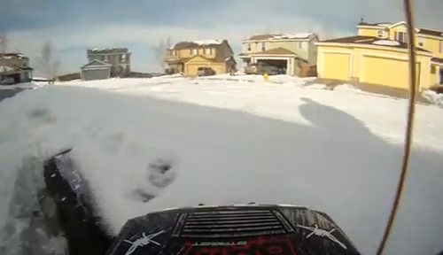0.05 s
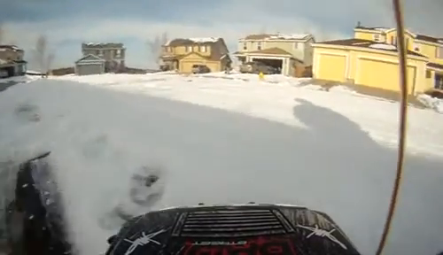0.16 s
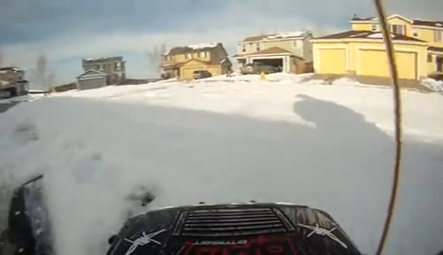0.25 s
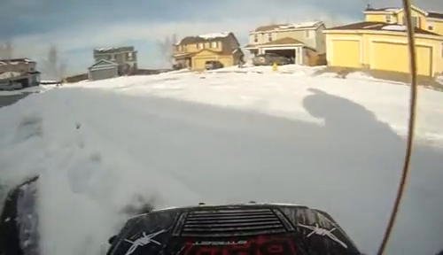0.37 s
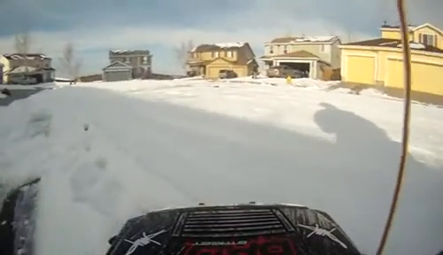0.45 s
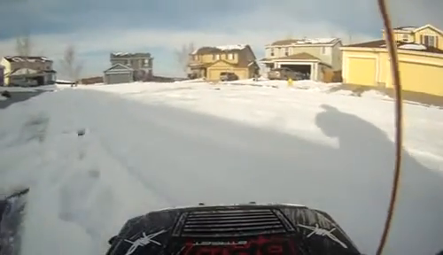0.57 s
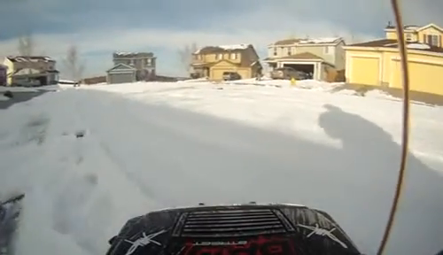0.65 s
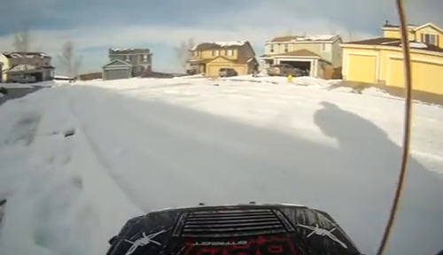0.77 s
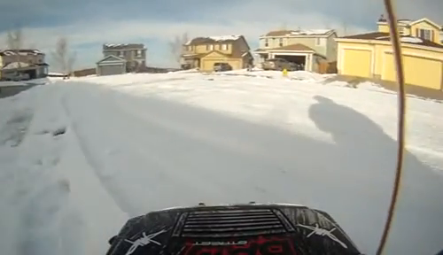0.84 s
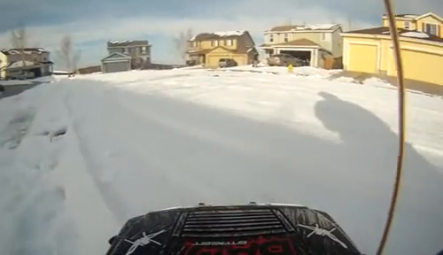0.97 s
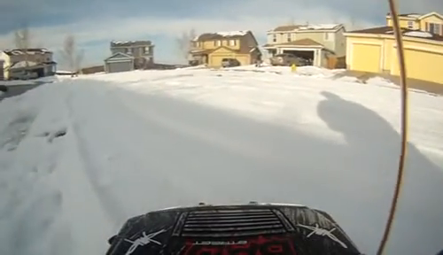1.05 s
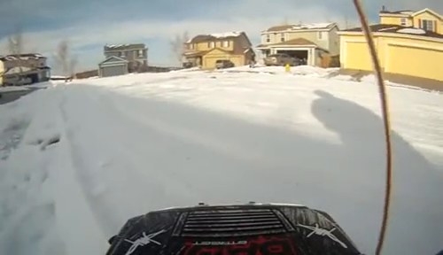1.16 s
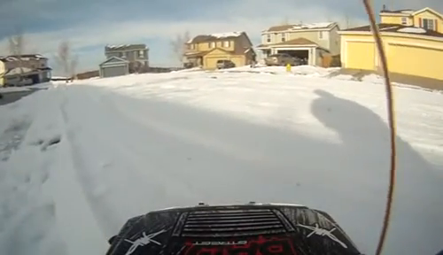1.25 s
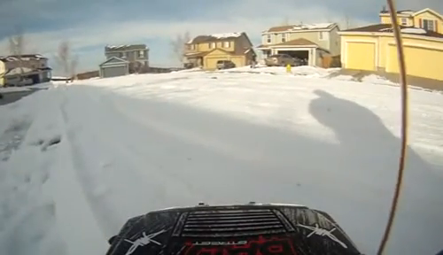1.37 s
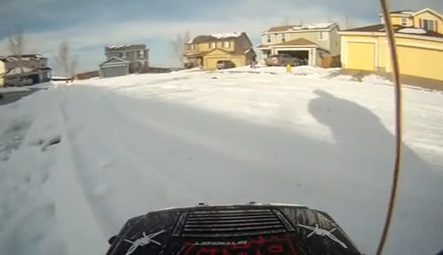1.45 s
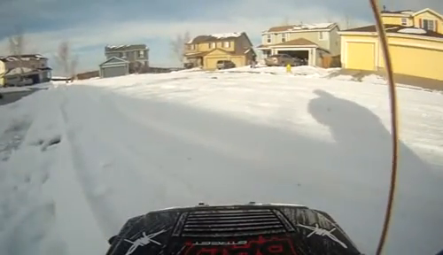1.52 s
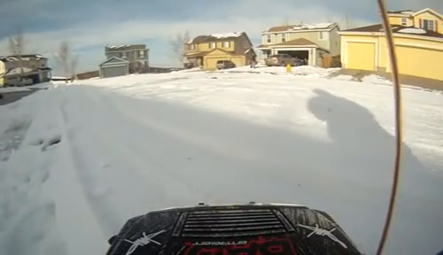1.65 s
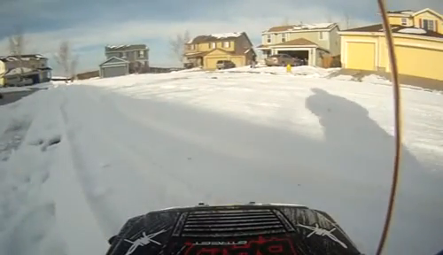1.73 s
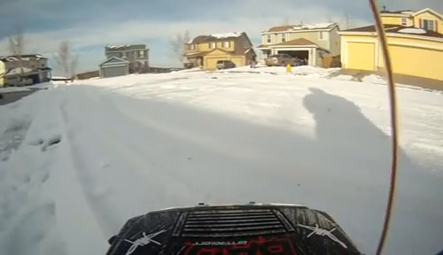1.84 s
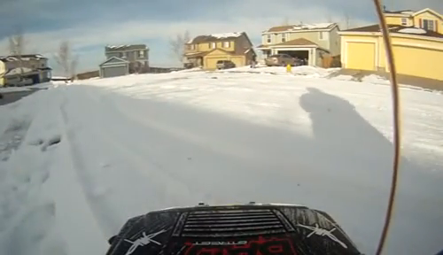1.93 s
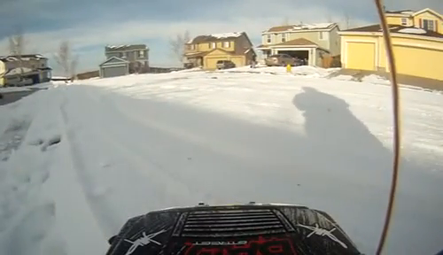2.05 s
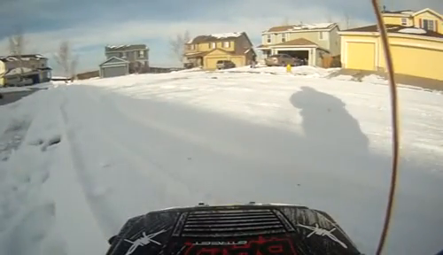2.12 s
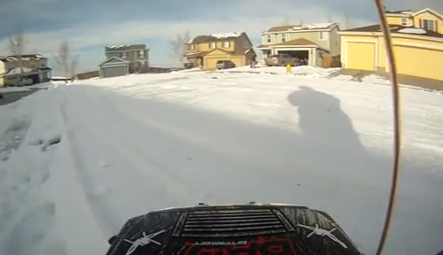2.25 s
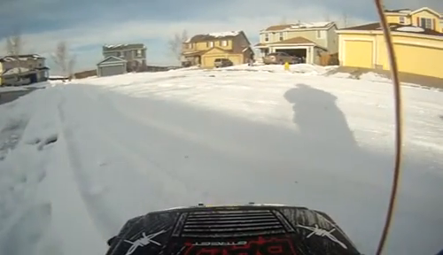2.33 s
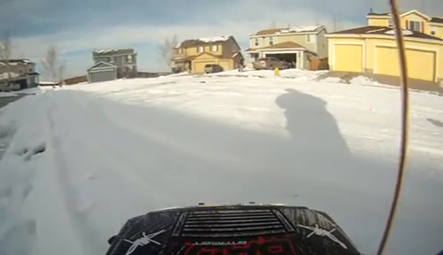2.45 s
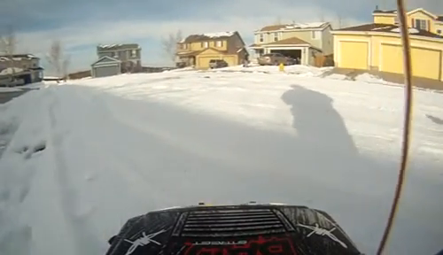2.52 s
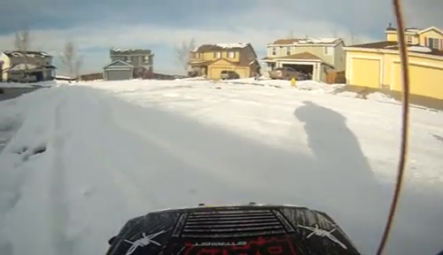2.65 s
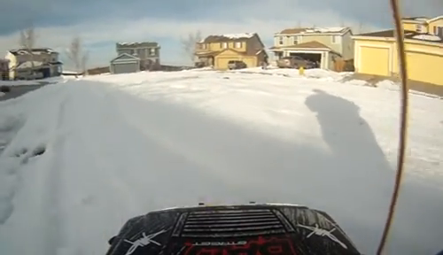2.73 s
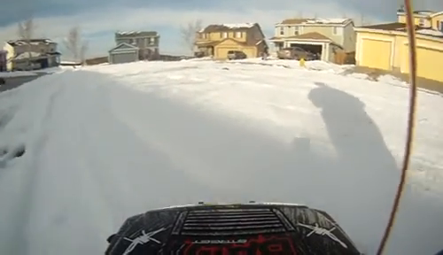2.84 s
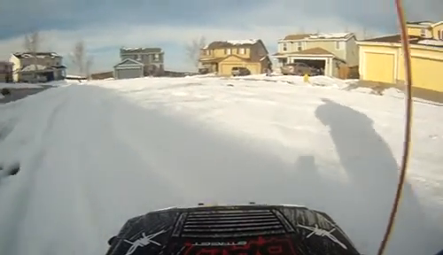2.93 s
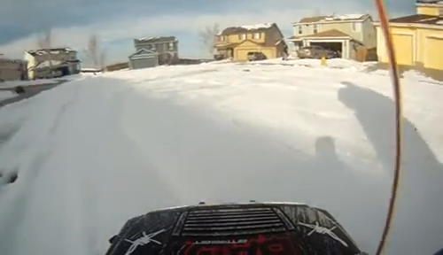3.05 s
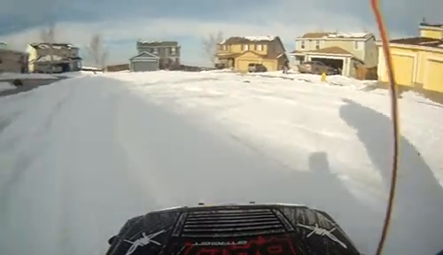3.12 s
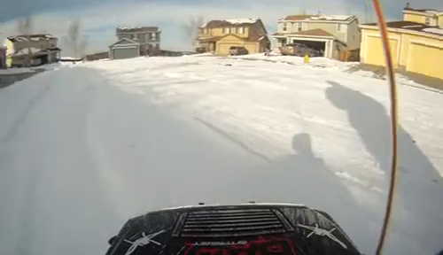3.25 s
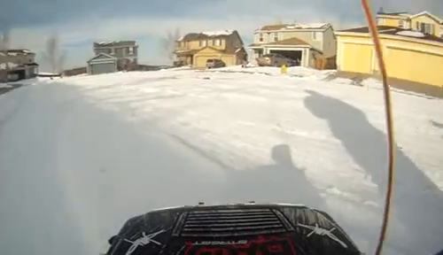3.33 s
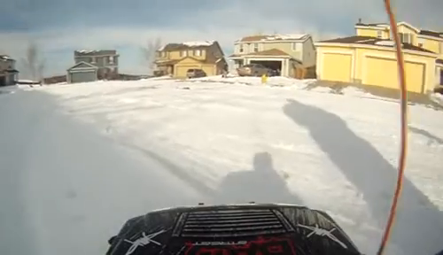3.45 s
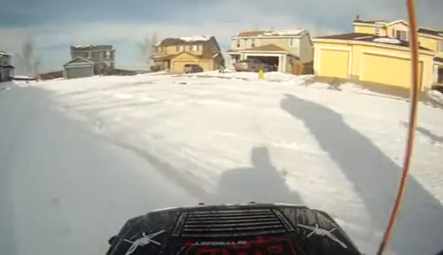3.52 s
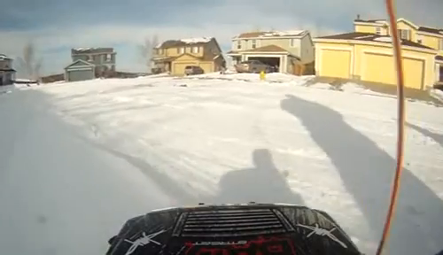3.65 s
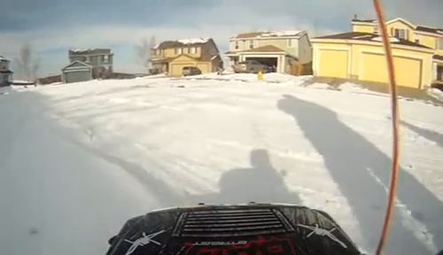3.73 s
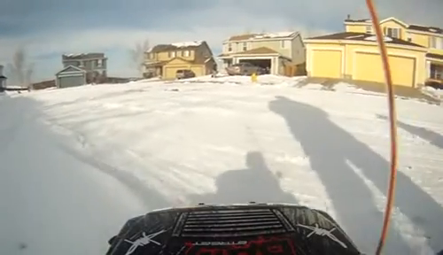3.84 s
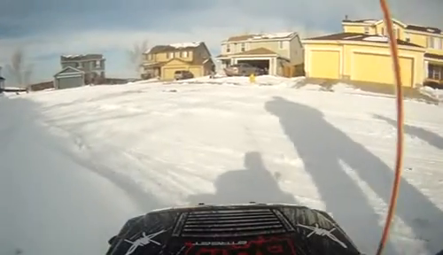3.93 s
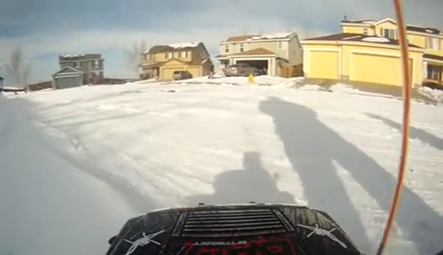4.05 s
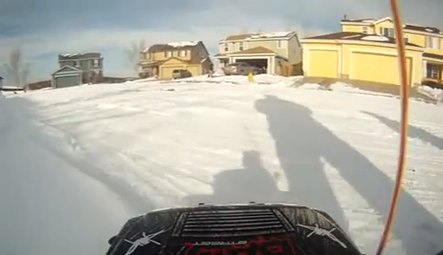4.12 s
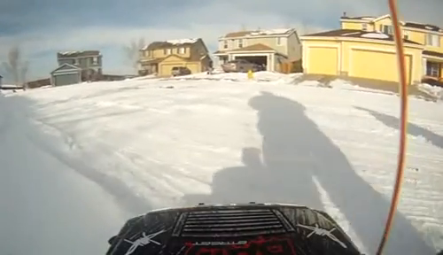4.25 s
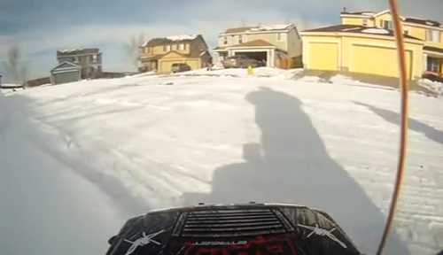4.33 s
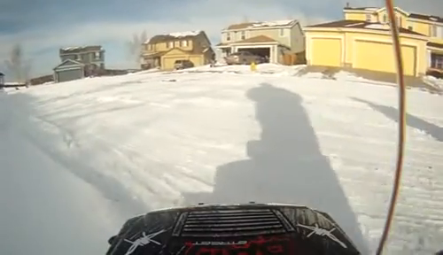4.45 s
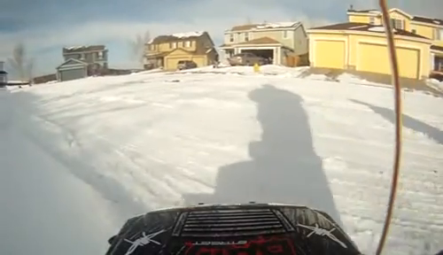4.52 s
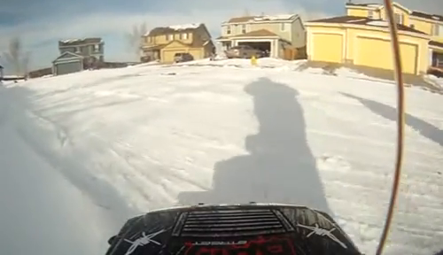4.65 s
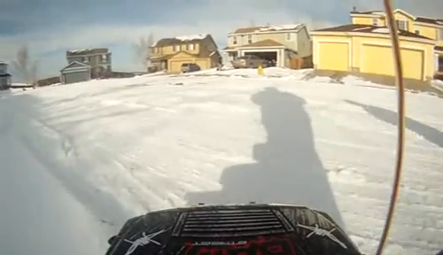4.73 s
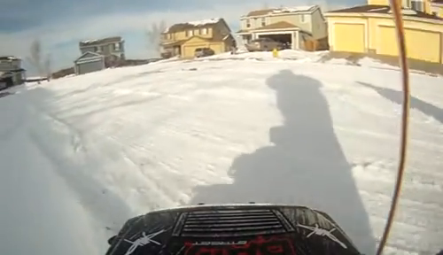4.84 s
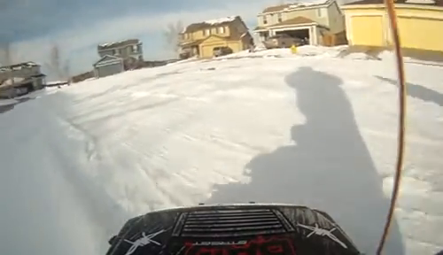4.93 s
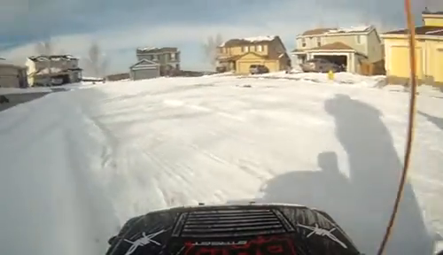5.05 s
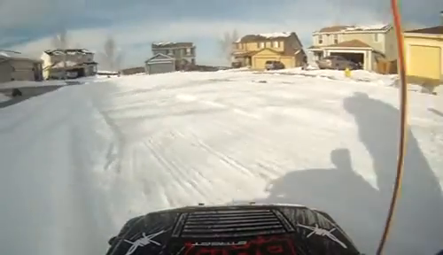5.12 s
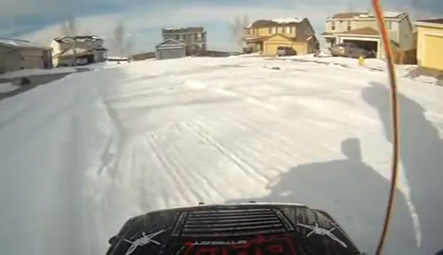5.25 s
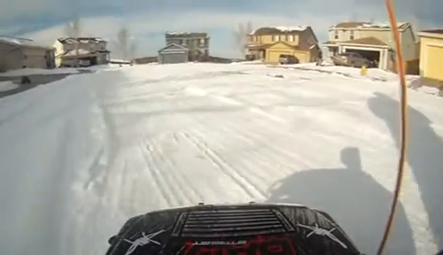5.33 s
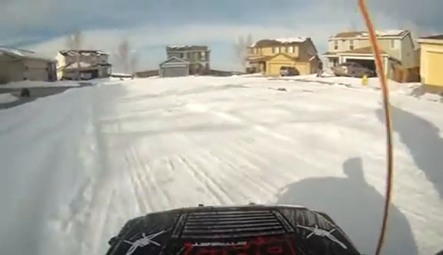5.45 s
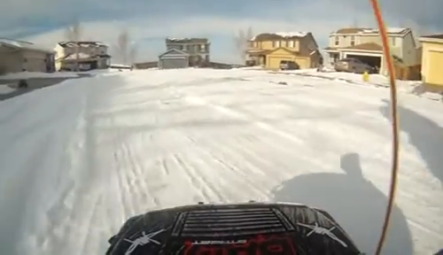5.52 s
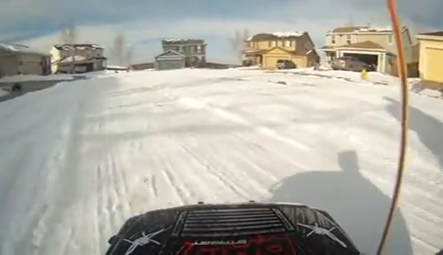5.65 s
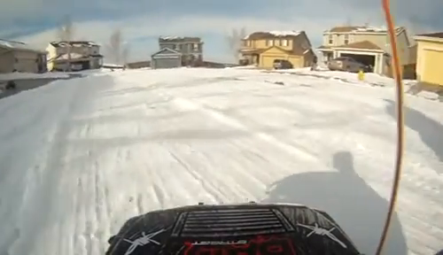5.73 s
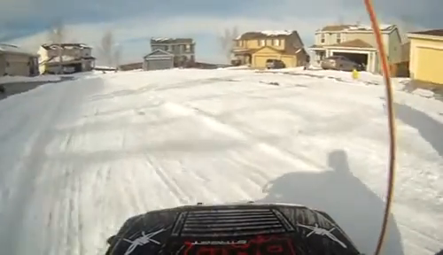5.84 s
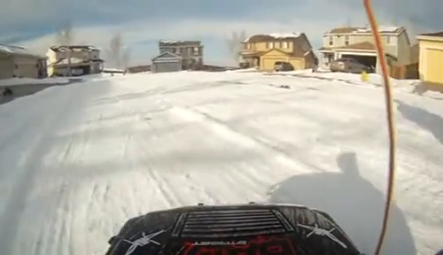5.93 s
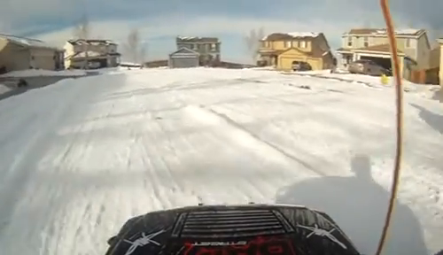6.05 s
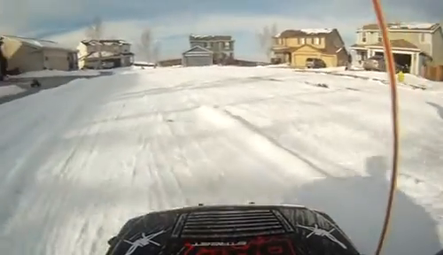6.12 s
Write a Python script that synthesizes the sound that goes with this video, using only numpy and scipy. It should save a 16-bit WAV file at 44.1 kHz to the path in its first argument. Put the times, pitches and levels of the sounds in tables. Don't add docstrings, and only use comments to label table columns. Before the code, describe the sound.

A low-grade microphone centimetres from the wheels catches grainy, boxy snow crunching that surges and dips over bumps, with deep spring wobble and plastic ticking. Everything drops to quiet hiss, with muffled snow pressed by boots. Then a cracking jolt, more crunching, a softer stretch, short chirpy gear squeaks with another hard knock, and finally dense rattling, thumping travel over ruts.

```python
import sys
import numpy as np
from scipy import signal
from scipy.fft import rfft, irfft, next_fast_len
from scipy.io import wavfile
from scipy.ndimage import uniform_filter1d

SR = 44100
rng = np.random.default_rng(int(sys.argv[2]) if len(sys.argv) > 2 else 0)


def volts_from_decibels(level):
    exponent = np.asarray(level, float) / 20
    return 10 ** exponent


def wav_out(sig):
    wavfile.write(sys.argv[1], SR, np.round(np.clip(np.atleast_2d(sig).T, -1, 1) * 32767).astype(np.int16))


N = 272538
TIME = np.arange(N) / SR
STOP_S = 1.3033


def rms_one(x):
    return x / np.sqrt(np.mean(x ** 2) + 1e-20)


def bandpass(x, low_hz, high_hz, order=2):
    return signal.sosfilt(signal.butter(order, [low_hz, high_hz], "band", fs=SR, output="sos"), x)


def filtered(x, points):
    hz, db = np.transpose(points)
    size = next_fast_len(N + 4096)
    bins = np.fft.rfftfreq(size, 1 / SR) + 0.00099
    gain = volts_from_decibels(np.interp(np.log(bins), np.log(hz), db))
    return irfft(rfft(x, size) * gain, size)[:N]


def in_time(rows):
    s, *columns = np.transpose(rows)
    return [np.interp(TIME, s, column) for column in columns]


def drift(rate_hz):
    r = np.exp(-80 * np.pi * rate_hz / SR)
    slow = signal.lfilter([1], [1, -2 * r, r * r], rng.standard_normal(N // 40 + 2002))[2000:]
    return np.interp(np.arange(N) / 40, np.arange(len(slow)), rms_one(slow))


def resonance(x, hz, width_hz):
    r = np.exp(-np.pi * width_hz / SR)
    poles = [1, -2 * r * np.cos(2 * np.pi * hz / SR), r * r]
    return signal.lfilter([(1 - r * r) / 2, 0, (r * r - 1) / 2], poles, x)


def body(x, modes, flicker_db, rate_hz, tilt_db=0):
    out = np.zeros(N)
    for k, (hz, width_hz, db) in enumerate(modes):
        uneven = x * volts_from_decibels(flicker_db * drift(rate_hz))
        level = volts_from_decibels(db + tilt_db * np.log2(1400 / hz))
        out += (-1) ** k * resonance(uneven, hz, width_hz) * level
    return out


def grains(per_s, spread_db):
    sizes = volts_from_decibels(spread_db * np.minimum(rng.exponential(1, N), 4)) * rng.choice([-1, 1], N)
    return rms_one(sizes * (rng.random(N) < per_s / SR)) + 1e-18


def dying(at_s, t60_s, rise_s):
    age = np.maximum(TIME - at_s, 0)
    return (1 - np.exp(-age / rise_s)) * volts_from_decibels(-60 * age / t60_s)


def peaks_db(s, level_db, rise, fall):
    s, level_db, rise, fall = (np.reshape(column, (-1, 1)) for column in (s, level_db, rise, fall))
    age = TIME[::40] - s
    each = level_db - np.maximum(-age * rise, age * fall)
    total_db = 10 * np.log10(np.sum(volts_from_decibels(2 * each), axis=0) + 1e-14)
    return np.interp(TIME, TIME[::40], total_db)


def while_moving(db, ring_out, drop_db=0):
    still = TIME - STOP_S
    drop = drop_db * np.clip(still / 0.02, 0, 1)
    fading = db[round(STOP_S * SR)] - drop - ring_out * still
    return np.where((still > 0) & (TIME < KNOCKS[0][0] + .004), fading, db)


# (time [s], tyre load as crunch level [dB], crustiness [dB], roughness [dB])
DRIVE = [(0.0, -19, -16.5, -21), (0.285, -23, -22, -31.5), (0.693, -23, -25, -28.5),
         (0.96, -25.5, -31, -29.5), (1.34, -21.5, -28, -30), (2.392, -39, -25, -20),
         (2.62, -17.5, -22.5, -36), (2.86, -19, -21, -27.5), (3.383, -18, -22, -20.5),
         (3.722, -19, -29, -26.5), (3.809, -24.5, -31, -33), (3.96, -39.5, -28.4, -29.5),
         (4.46, -30.5, -24.5, -30), (4.71, -23.5, -25.5, -27), (5.085, -16, -22.5, -24.5),
         (5.418, -18.5, -20, -26), (5.688, -17.5, -19, -22.5), (6.18, -22.5, -22, -20.5)]
# (time [s], depth [dB], recovery [s])
HOPS = [(0.043, 11, 0.13), (0.307, 7, 0.12), (0.545, 2.5, 0.043), (0.72, 5, 0.068), (1.069, 11, 0.063),
        (1.167, 9, 0.064), (1.245, 3.5, 0.11), (2.713, 8.5, 0.17), (2.915, 16, 0.16), (3.039, 10, 0.051),
        (3.105, 7, 0.146), (3.384, 7.5, 0.21), (3.623, 4.6, 0.045), (3.716, 6.5, 0.077), (4.165, 3.5, 0.1),
        (4.346, 6.5, 0.087), (4.796, 6, 0.073), (4.96, 3.5, 0.087), (5.111, 11, 0.23), (5.238, 4, 0.22),
        (5.459, 14.5, 0.26), (5.698, 9.5, 0.12), (5.793, 10, 0.214), (6.062, 5, 0.031)]
# (time [s], depth [dB], recovery [s])
MORE_HOPS = [
    (1.247, 10, .012),
    (4.62, 16, .057),
]


def tyre_load():
    load_db = in_time(DRIVE)[0]
    unload_s = 0.027
    for s, depth_db, recovery_s in HOPS + MORE_HOPS:
        age = TIME - s
        dip = np.minimum(age / unload_s, 1 - (age - unload_s) / recovery_s)
        load_db = load_db - depth_db * np.clip(dip, 0, 1)
    return while_moving(load_db, 190, drop_db=19)


# (frequency [Hz], width [Hz], level [dB])
SHELL = [(575, 131, -8.5), (746.3, 36.5, -2), (1010.7, 104, -0.5), (1151, 32.5, 4), (1402, 183, -0.5),
         (1731, 302, 0.5), (1833, 181, 2.5), (2007, 91, -1.5), (2183, 159, -5.5), (2579, 73, -12)]
# (frequency [Hz], width [Hz], level [dB])
UPPER_SHELL = [(2730, 150, -12), (2877, 100, -2.5), (3489, 85, -1.4), (3640, 150, -6)]


def crunch():
    crunch_db, upper_db = tyre_load(), in_time(DRIVE)[1]
    tilt_db = np.clip(-6 - 0.22 * crunch_db, -5, 12)
    breaks = grains(per_s=5000, spread_db=3.5) * volts_from_decibels(0.51 * drift(22))
    main = rms_one(body(breaks, SHELL, 1.8, 7, tilt_db))
    main = bandpass(main, 420, 2800, order=4)
    upper = rms_one(body(breaks, UPPER_SHELL, 3.5, 33))
    upper = bandpass(upper, 2700, 3950)
    haze = rms_one(bandpass(breaks, 3900, 5600))
    return volts_from_decibels(crunch_db) * (1.271 * main + volts_from_decibels(upper_db) * upper + volts_from_decibels(-45) * haze)


# (frequency [Hz], level per Hz [dB])
HISS = [(18, -25), (30, -2), (65, -3), (310, -8.5), (370, -12), (700, -13.5), (4080, -21.5), (5800, -31.5),
        (7540, -64), (12800, -120)]


def recorder_hiss():
    return volts_from_decibels(-61) * rms_one(filtered(rng.standard_normal(N), HISS))


# (time [s], bounce level [dB], pitching level [dB], thud level [dB])
BUMPS = [(0.042, -15.5, -18.5, -21), (0.188, -14.5, -60.0, -30.5), (0.241, -17, -20.7, -30.5),
         (0.311, -15, -17, -31), (0.54, -13, -22, -32.5), (0.914, -60.0, -26.0, -39),
         (1.023, -14, -27, -35.5), (1.17, -21.5, -17, -38.5), (2.619, -14.5, -28.4, -34.6),
         (2.732, -17, -14.5, -30), (2.801, -15, -60.0, -41), (2.916, -14.5, -15, -26),
         (3.035, -17.1, -58, -54), (3.122, -18, -29, -29.5), (3.385, -20, -16, -31),
         (3.969, -19.4, -27, -66), (4.045, -26, -27, -57), (4.271, -24, -22.5, -64), (4.513, -24, -18, -42),
         (4.722, -65, -24, -36), (4.821, -62, -20, -35), (4.975, -14.5, -20, -34), (5.125, -15, -14, -29.5),
         (5.246, -16, -24, -30), (5.456, -9.5, -19, -29.5), (5.55, -28, -19.5, -54), (5.702, -15, -16, -34),
         (5.799, -13, -24.5, -33.5), (5.929, -23.5, -24, -75), (6.052, -15, -31, -46)]
# (share of roughness [dB], build-up [dB/s], die-away [dB/s], ring-out at the stop [dB/s])
MOTIONS = [
    (1.5, 240, 198, 94),
    (-3.5, 203, 236, 57),
    (-17, 245, 389, 108),
]


def motion_db(column):
    share_db, rise, fall, ring_out = MOTIONS[column]
    bumps = np.array(BUMPS)
    bump_db = peaks_db(bumps[:, 0], bumps[:, column + 1], rise, fall)
    ground_db = in_time(DRIVE)[2] + share_db
    power = volts_from_decibels(2 * bump_db) + volts_from_decibels(2 * ground_db)
    return while_moving(10 * np.log10(power), ring_out)


def fed(modes, size):
    low, high = min(modes)[0], max(modes)[0]
    swing = body(rng.standard_normal(N), modes, 1.54, 12)
    swing = resonance(swing, np.sqrt(low * high), 1.59 * (high - low))
    level = np.sqrt(uniform_filter1d(swing ** 2, size=size) + 1e-12)
    return rms_one(swing / level ** 1.19)


# (frequency [Hz], width [Hz], level [dB])
BOUNCE = [(43.54, 3.5, -6), (34, 17.3, -17.5), (51.1, 2.7, -9.5)]
# (frequency [Hz], width [Hz], level [dB])
PITCHING = [(74.95, 12.2, 3), (63.1, 9, 4.5), (91, 46, -15.5)]
# (frequency [Hz], width [Hz], level [dB])
THUD = [(115.4, 35, -3), (169, 19.2, 1.4), (256, 17.2, -4), (356, 270, -20.5)]


def shudder():
    bounce_db, pitching_db, thud_db = (motion_db(column) for column in range(3))
    springs = volts_from_decibels(bounce_db) * fed(BOUNCE, size=3000) + volts_from_decibels(pitching_db) * fed(PITCHING, size=2500)
    thuds = volts_from_decibels(thud_db) * fed(THUD, size=1500)
    decay = volts_from_decibels(-60 / (0.025 * SR))
    bursts = signal.lfilter([1], [1, -decay], np.abs(grains(per_s=270, spread_db=3)))
    rattle = bandpass(bursts * rng.standard_normal(N), 3600, 6500)
    rattle_db = -62 + (np.clip(thud_db, -110, -32) + 34.5) + 2 * drift(9)
    return springs + thuds + volts_from_decibels(rattle_db) * rms_one(rattle)


def thumps():
    out, age = np.zeros(N + SR), np.arange(-1500, 1500) / SR
    push = np.cos(2 * np.pi * 75 * age) * np.exp(-.5 * (age / 0.0039) ** 2)
    for s, _, _, thud_db in BUMPS:
        i = round(s * SR) - 1500
        out[i:i + 3000] += volts_from_decibels(thud_db + 12) * push
    return out[:N]


# (time [s], peak [dB])
TICKS = [(0.0287, -30.5), (0.1391, -57), (0.1655, -41), (0.2189, -30.5), (0.257, -36), (0.4574, -43),
         (0.5312, -34), (0.5465, -30.5), (0.8485, -36.5), (1.0116, -41), (1.1867, -38), (1.2554, -48),
         (2.4518, -40), (2.5215, -36), (2.58, -44), (2.6454, -39), (2.726, -29), (2.787, -39),
         (2.8245, -38), (2.8694, -40), (2.9003, -32), (2.9871, -50), (3.1098, -32), (3.1953, -38),
         (3.2809, -32), (3.3026, -30), (3.3708, -28.5), (3.4166, -35), (4.1425, -40), (4.485, -38.5)]
# (time [s], peak [dB])
RUT_TICKS = [(4.6194, -22), (4.6515, -34), (4.73, -39), (4.8803, -33), (4.9377, -40), (4.9536, -35),
             (5.0035, -32), (5.085, -37), (5.1148, -29), (5.1627, -35), (5.2066, -32.5), (5.235, -34.5),
             (5.3532, -43), (5.4211, -34), (5.44, -37), (5.458, -28), (5.4979, -38), (5.5448, -39),
             (5.5852, -40), (5.6341, -42), (5.674, -38), (5.7296, -36), (5.7825, -34), (5.8628, -37),
             (5.9975, -38), (6.0413, -32.5), (6.102, -39), (6.128, -34)]


def ticks():
    out, noise = np.zeros(N), rng.standard_normal(N)
    small = []
    for s, _, _, thud_db in BUMPS:
        for early in rng.uniform(-1, 1, 2):
            small.append((abs(s + .09 * early), -44 + 0.68 * (thud_db + 35.5)))
    clear, chatter = TICKS + RUT_TICKS, []
    for s, peak_db in clear:
        for _ in range(2):
            if _ == 0:
                later_s, softer_db = 0, 0
                gaps = rng.uniform(.4, 1.6, (2, 2))
            later_s += .011 * gaps[_, 0]
            softer_db += 5.5 * gaps[_, 1]
            chatter.append((s + later_s, peak_db - softer_db))
    age = np.arange(900) / SR
    for s, peak_db in clear + small + chatter:
        i = round(s * SR)
        burst = noise[i:i + 900] * volts_from_decibels(peak_db + 7.0 - 60 * age / .022)[:N - i]
        burst = resonance(burst, rng.uniform(3700, 4900), 2400)
        out[i:i + 900] += resonance(burst, 4300, 3600)
    return out


# (time [s], length [s], first frequency [Hz], last frequency [Hz], level [dB])
SQUEAKS = [(4.437, 0.06, 1730, 1617, -17.5), (4.481, 0.063, 1130, 1188, -19),
           (4.529, 0.019, 1390, 1750, -16.5), (4.548, 0.027, 1850, 1802, -12),
           (4.571, 0.039, 1885, 1854, -15.5), (5.17, 0.067, 1160, 1145, -19.5),
           (5.355, 0.047, 1950, 1817, -18), (1.17, 0.035, 5430, 5400, -48), (1.22, .018, 5430, 5280, -47)]
# (time [s], frequency [Hz], level [dB], t60 [s])
AFTER_RING = [(1.29, 1150, -34, .3), (1.3, 1375, -44, .6), (1.36, 170, -46, .35)]


def squeaks():
    out = np.zeros(N)
    for s, length, first_hz, last_hz, level_db in SQUEAKS:
        end = s + length
        hz = np.interp(TIME, [s, end], [first_hz, last_hz])
        gate = np.clip(np.minimum((TIME - s) / .008, (end - TIME) / .003), 0, 1)
        turn = 2 * np.pi * np.cumsum(hz + 35 * drift(154.4)) / SR
        grip = 1 + .35 * drift(110)
        out += gate * grip * volts_from_decibels(level_db) * (np.sin(turn) + 0.048 * np.sin(2 * turn))
    for s, hz, level_db, t60_s in AFTER_RING:
        out += volts_from_decibels(level_db) * np.sin(2 * np.pi * hz * TIME) * dying(s, t60_s, 0.0049)
    return out


# (time [s], level [dB], swell [dB/s], fade [dB/s])
STEPS = [(1.585, -58, 119, 86), (1.63, -61.5, 111, 905), (1.89, -62, 117, 903), (1.93, -55.5, 898, 74),
         (2.019, -42.5, 254, 399)]
# (frequency [Hz], level per Hz [dB])
STEP_COLOUR = [(290, -41), (500, -13), (879, -8), (1150, 1), (1270, -9), (1780, 2.5), (3810, -12),
               (5800, -26), (7540, -68), (12800, -120)]


def footsteps():
    packing = filtered(grains(per_s=3000, spread_db=4.0), STEP_COLOUR)
    return volts_from_decibels(peaks_db(*np.transpose(STEPS))) * rms_one(packing)


# (time [s], peak [dB], t60 [s], jolt to the springs [dB], rebound delay [s])
KNOCKS = [
    (2.3655, -2.5, .06, 2, .02),
    (4.62, -4, .045, -1, .0175),
]


def knocks():
    out, muffle = np.zeros(N), signal.butter(3, 2600, fs=SR, output="sos")
    for s, level_db, t60_s, jolt_db, rebound_s in KNOCKS:
        crack = rng.standard_normal(N)
        shell = body(crack, SHELL, 0, 1) + 0.25 * resonance(crack, 1400, 3300)
        shell = rms_one(signal.sosfilt(muffle, shell))
        edges = .5 * resonance(crack, 3070, 250) + 1.64 * resonance(crack, 153, 246)
        kick = np.sin(2 * np.pi * 45 * (TIME - s - rebound_s)) * dying(s, .16, .03)
        floor_pan = np.sin(2 * np.pi * 170 * (TIME - s)) * dying(s, 0.04, 0.0013)
        out += volts_from_decibels(level_db) * (shell + edges) * dying(s, t60_s, 0.0013)
        out += volts_from_decibels(jolt_db) * (kick + 0.38 * floor_pan)
    return out


def scene():
    car = crunch() + recorder_hiss() + shudder() + thumps() + ticks()
    car = car + squeaks() + footsteps() + knocks()
    return np.array([car, car])


def band_limit(x):
    return signal.sosfilt(signal.butter(12, 12430, fs=SR, output="sos"), x)


# (frequency [Hz], level [dB])
APART = [(60, -28.5), (110, -29.5), (190, -20), (350, -12.5), (630, -24.5), (1130, -37), (2030, -33),
         (3660, -20), (6580, -4), (9500, -24.5), (12000, -11)]


def record(dry):
    stored_hz = 12000
    x = 1.5 * np.tanh(dry[0] / 1.5)
    x = signal.sosfilt(signal.cheby2(12, 30, 6050, fs=SR, output="sos"), x)
    x = x * (1 + 2 * np.cos(2 * np.pi * stored_hz * TIME))
    size = next_fast_len(N + 4096)
    holding = np.sinc(np.fft.rfftfreq(size, 1 / SR) / stored_hz)
    x = irfft(rfft(x, size) * holding, size)[:N]
    x = x / (1 + (x / .97) ** 6) ** (1 / 6)
    x = signal.sosfilt(signal.cheby2(16, 60, 12900, fs=SR, output="sos"), x)
    patches = volts_from_decibels(-9.5 + 7.8 * drift(8.8))
    apart = filtered(x * drift(38) * patches, APART)
    return band_limit(np.array([x + apart, x - apart]))


dry = scene()
out = record(dry)
wav_out(out)
```